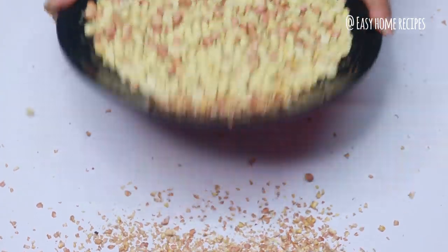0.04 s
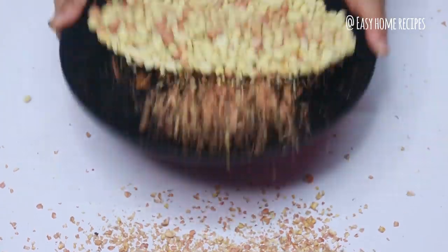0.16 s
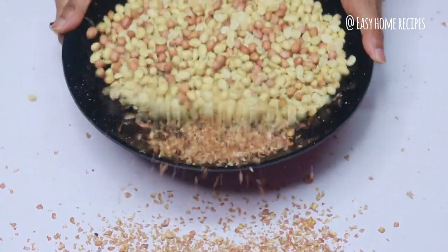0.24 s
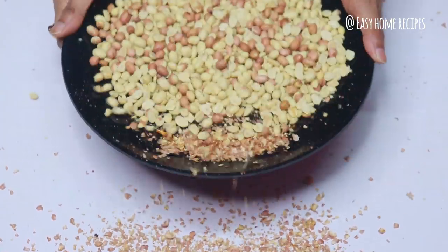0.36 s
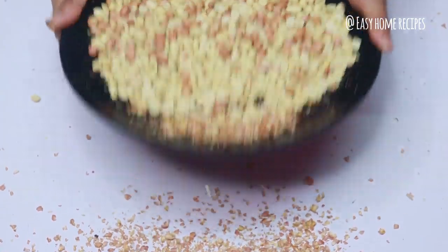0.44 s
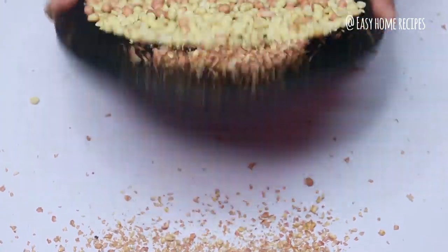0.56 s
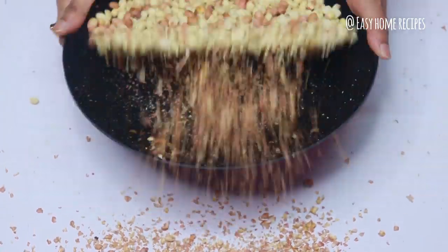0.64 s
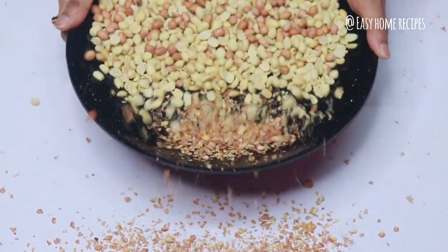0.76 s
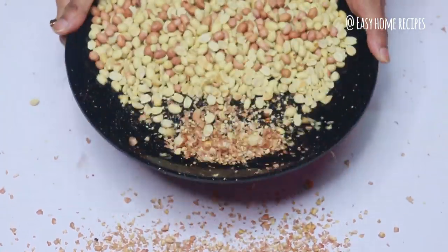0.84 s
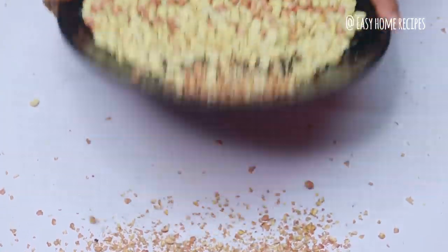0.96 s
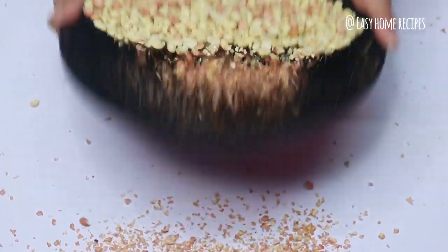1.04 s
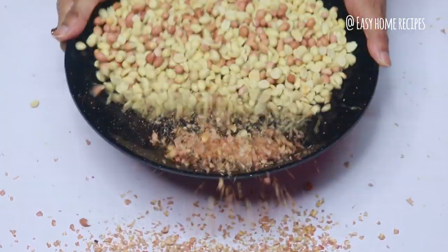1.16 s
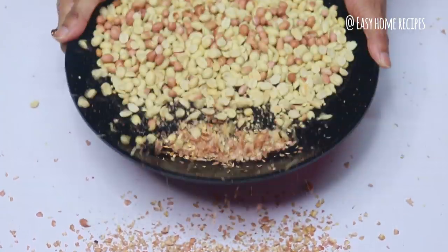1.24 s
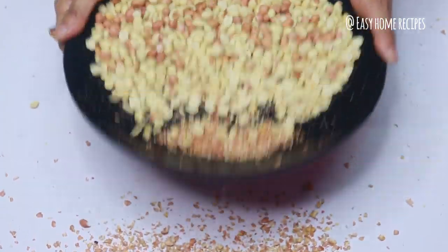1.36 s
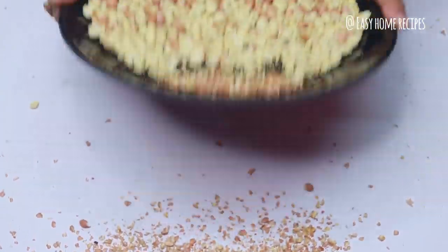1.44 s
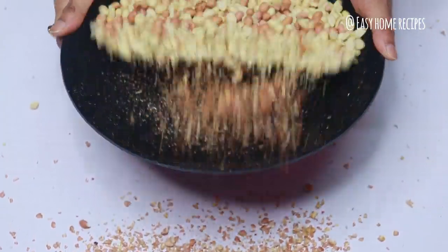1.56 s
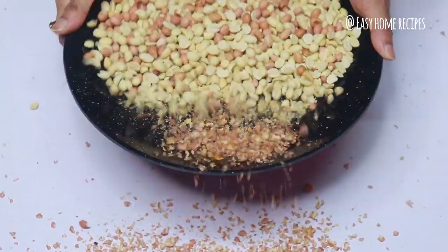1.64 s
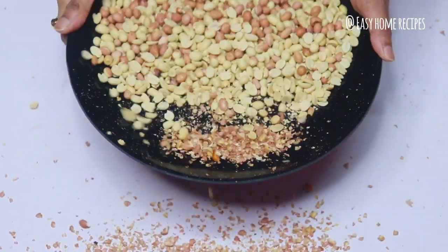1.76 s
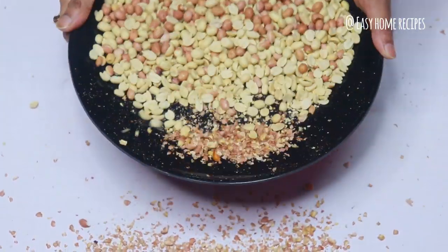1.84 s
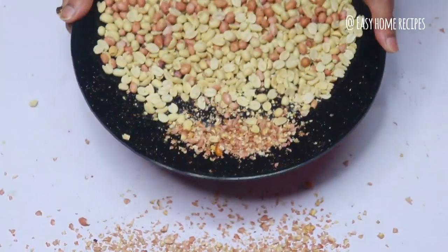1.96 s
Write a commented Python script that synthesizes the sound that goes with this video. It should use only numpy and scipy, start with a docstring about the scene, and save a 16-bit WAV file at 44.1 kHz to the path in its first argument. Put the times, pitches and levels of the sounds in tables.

```python
"""A heap of roasted peanuts is tossed on a wide plate about twice a second in a small kitchen.
An earlier toss is still dying away at first, over a steady room tone, with stray ticks in most of the pauses.
Every landing is a shower of random impacts: each rings decaying plate modes and a short noise burst.
Rolling follows each landing and dies away; low booms, gliding sines, swell now and then.
The recorder clips any peak above full scale."""
import sys
import numpy as np
from scipy import signal
from scipy.fft import rfft, irfft
from scipy.io import wavfile

SR = 44100
rng = np.random.default_rng(int(sys.argv[2]) if len(sys.argv) > 2 else 0)


def int16_out(signal):
    """Quantize to a 16-bit WAV file."""
    q = np.round(np.clip(np.atleast_2d(signal).T, -1, 1) * 32767)
    wavfile.write(sys.argv[1], SR, q.astype(np.int16))


def gain_from_db(level_db):
    """Turn a decibel level (scalar or array-like) into a linear amplitude factor."""
    decades = np.asarray(level_db, float) / 20
    return 10 ** decades


N = 88200
LEAD = SR // 2  # samples computed ahead of time zero, so that the earlier toss is heard dying away

# Tosses of the heap. Each row: first contact, first clicks, middle of the landing and its spread, all in
# seconds, rolling level in dB relative to the landing, factor on the rolling decay time,
# then landing levels in dB of heap, plate knocks, clicks and skins.
TOSS_ROWS = [(-.27, -.26, -0.22, 0.011, -9, 1.65, -19.5, -9.5, -14, -11.5),
             (0.183, 0.197, 0.25, 0.036, -8, 1.005, -14.5, -9.5, -10.5, -11),
             (0.611, 0.632, 0.71, 0.041, -7, 0.87, -15, -11, -12, -13),
             (1.079, 1.082, 1.167, 0.038, -6.5, 1.08, -15, -11.5, -13.5, -13),
             (1.533, 1.554, 1.634, 0.038, -4.5, 0.78, -16.5, -12.5, -12, -13.5)]


def colour(x, points):
    """Minimum-phase filtering: the folded cepstrum of a log gain through (Hz, dB) points is causal."""
    p = np.array(points, float)
    f = np.maximum(np.arange(1025) * SR / 2048, 1)
    log_gain = np.interp(np.log(f), np.log(p[:, 0]), p[:, 1]) * np.log(10) / 20
    cepstrum = irfft(log_gain)
    cepstrum[1:1024] *= 2
    cepstrum[1025:] = 0
    response = irfft(np.exp(rfft(cepstrum)))
    return signal.fftconvolve(x, response)[:len(x)]


def unit(x):
    """Normalization: the sum of squares becomes 1."""
    return x / np.sqrt(np.sum(x ** 2))


def fade(t, t60):
    """Exponential decay: linear damping lowers the amplitude by 60 dB in t60 seconds."""
    return np.exp(-np.log(1000) * t / t60)


def room_tone():
    """Stationary noise: a random signal with a fixed spectral envelope, strongest in the bass."""
    # Each row: frequency in Hz, relative level in dB.
    envelope = [(20, -19), (45, -2), (70, 2.5), (110, -5.5), (250, -8), (500, -11), (1500, -15),
                (4000, -20.5), (9000, -30), (15500, -33)]
    rms_db = -48
    noise = colour(rng.standard_normal(N + SR), envelope)[SR:]
    return unit(noise) * np.sqrt(N) * gain_from_db(rms_db)


def body(modes, modes_db, points, t60):
    """Modal superposition: a spot's place sets its share of each mode; a noise burst joins them."""
    place_db, detune = 9, 0.0045  # standard deviations: mode level, relative frequency
    t = np.arange(SR // 10) / SR
    luck = rng.standard_normal((len(modes), 2))
    ring = 0
    for (hz, db, mode_t60), (share, shift) in zip(modes, luck):
        sine = np.sin(2 * np.pi * hz * (1 + detune * shift) * t)
        # the square root keeps a mode's energy from growing with its decay time
        ring = ring + gain_from_db(db + place_db * share) * sine * fade(t, mode_t60) / np.sqrt(mode_t60)
    burst = colour(rng.standard_normal(len(t)) * fade(t, t60), points)
    return unit(gain_from_db(modes_db) * unit(ring) + unit(burst))


def shower(index, lag, wide, roll_db, roll_t60):
    """Power envelope: landings spread about their middle feed rolling that decays exponentially."""
    squareness = 2.324  # exponent of the landing's bell curve; 2 is Gaussian
    swell_s, roll_build_s = 0.033, 0.027
    t = np.arange(-LEAD, N) / SR
    power = 1e-9
    for contact, clicks, middle, spread, below_db, longer, *levels_db in TOSS_ROWS:
        onset = (contact, clicks)[index // 2]  # heap and plate knocks start at contact
        bell = np.exp(-np.abs((t - middle - lag) / (spread * wide)) ** squareness)
        land = bell * np.clip((t - onset) / swell_s, 0, 1)
        # power decays as the square of amplitude, hence the 2
        keep = fade(2 / SR, roll_t60 * longer)
        roll = signal.lfilter([1 / (SR * spread * np.sqrt(2 * np.pi))], [1, -keep], land)
        build = 1 / (SR * roll_build_s)
        roll = signal.lfilter([build], [1, build - 1], roll)
        power = power + gain_from_db(2 * levels_db[index]) * (land + gain_from_db(2 * (below_db + roll_db)) * roll)
    return power


def impacts(power, scatter_db, first_db, spots, luck):
    """Shot noise: random impacts, fewer and lighter as power falls, are convolved with spot responses."""
    # First nuts to land. Each row: time in seconds, level in dB before the layer's own offset.
    first_nuts = [(0.205, -38), (0.2106, -20), (.219, -20), (0.6308, -15), (0.6395, -42), (0.651, -26),
                  (0.6573, -18), (0.6758, -4), (1.0914, -46), (1.1036, -42), (1.1124, -16), (1.5642, -20),
                  (1.5775, -13.5), (1.5908, -5)]
    most_per_s, sparse = 7000, 0.14  # sparse: exponent by which the impact rate follows power
    odds = np.clip((power / power.max()) ** sparse, 1e-3, 1) * most_per_s / SR
    size = gain_from_db(-scatter_db * np.log(luck[:, 1] + 0.004))  # the small term bounds the biggest impact
    hits = (luck[:, 0] < odds) * size * np.sqrt(power / odds / np.mean(size ** 2))
    for s, db in first_nuts:
        hits[int(s * SR) + LEAD] = gain_from_db(db + first_db) / np.abs(spots[0][0]).max()
    # each toss finds its own spots on the plate
    edges = [0] + [int(row[0] * SR) + LEAD for row in TOSS_ROWS[1:]] + [len(power)]
    out = np.zeros(len(power) + SR)
    for a, b, bodies in zip(edges, edges[1:], spots):
        spot = (luck[a:b, 2] * len(bodies)).astype(int)
        ring = sum(signal.fftconvolve(hits[a:b] * (spot == k), one) for k, one in enumerate(bodies))
        out[a:a + len(ring)] += ring
    return out[:len(power)]


def nuts():
    """Contact excitation: four kinds of impact, from the heap's weight to rustling skins, ring modes."""
    # Plate modes. Each row: nominal frequency in Hz, relative level in dB, decay time t60 in seconds.
    plate = [(441.3, -19, 0.24), (520, -4, 0.42), (629, -13, 0.24), (660, -12.5, 0.24), (724.7, 9, 0.22),
             (784.7, 11, 0.12), (928.7, -16, 0.077), (1175, -18, .05), (1357, 0.5, 0.11), (1450, -12, 0.13),
             (1640, -8, 0.078), (1748, 4, 0.093), (2318, -8.5, 0.21), (2720, 11, 0.025), (2868, -7, 0.091),
             (3570, 0.5, 0.15), (4010, -24.5, 0.12), (4900, -8, 0.017), (6140, 1, 0.06), (7165, 1, 0.019),
             (8330, 1.5, 0.019), (9320, -14, 0.0067)]
    # Spectra of the four noise bursts. Each row: frequency in Hz, relative level in dB.
    heap = [(220, -51.5), (350, -14), (480, 2), (750, 4), (1100, -13.5), (2500, -40.5)]
    knock = [(400, -36.5), (800, -10.5), (1200, 2.5), (1750, 5.5), (2100, -20), (4500, -37.5)]
    click = [(900, -24), (1900, -1), (2800, 2.5), (3600, -0.5), (4600, -4.5), (9000, -35)]
    skins = [(2500, -44.5), (4500, -0.5), (6200, 1.5), (8500, 0), (10000, -6.5), (12500, -19), (15600, -41)]
    # The next three tables have a row each for heap, plate knocks, clicks and skins.
    # Each row: lag in seconds, factor on the spread, offset of the rolling in dB, rolling t60 in seconds
    # before the toss's factor, scatter of impact sizes in dB, offset of the first nuts in dB.
    layers = [(-.002, 0.79, 2, 0.35, 2.5, -12.5), (0.006, 1.0, 2, 0.28, 2, -27),
              (.02, 1.22, 2.5, 0.41, 1.5, -10), (.022, 1.04, 0.5, 0.3, 3.5, -11)]
    # Each row: lower and upper limit in Hz of the modes rung.
    rung = [(0, 900), (900, 2000), (2000, 4500), (4500, 20000)]
    # Each row: level of the modes relative to the burst in dB, burst t60 in seconds.
    contact = [(-1.5, 0.078), (-3.5, 0.033), (-5, 0.04), (-5.5, 0.029)]
    out = 0
    luck = rng.random((N + LEAD, 3))  # shared draws: one nut sounds in every layer at once
    for k, burst in enumerate([heap, knock, click, skins]):
        lag, wide, roll_db, roll_t60, scatter_db, first_db = layers[k]
        lowest, highest = rung[k]
        modes_db, burst_t60 = contact[k]
        modes = [m for m in plate if lowest < m[0] < highest]
        spots = [[body(modes, modes_db, burst, burst_t60) for _ in range(8)] for _ in TOSS_ROWS]
        power = shower(k, lag, wide, roll_db, roll_t60)
        out = out + impacts(power, scatter_db, first_db, spots, luck)
    return out


def strays():
    """Damped noise bursts: single light ticks of skins and halves, each bright around its own centre."""
    # Stray ticks. Each row: start in seconds, peak level in dB, centre frequency in Hz.
    ticks = [(0.011, -37, 4670), (.026, -22.5, 7700), (0.032, -32, 13000), (0.037, -47.5, 13000),
             (0.098, -34.5, 7900), (0.148, -34, 6000), (0.196, -41, 5030), (0.887, -37, 14160),
             (1.326, -29.5, 10500), (1.392, -38, 13740), (1.424, -23, 7860), (1.433, -48, 14570),
             (1.471, -36, 13600), (1.522, -39.5, 14000), (1.747, -32, 12800), (1.85, -48, 8810)]
    t60 = 0.0072  # seconds
    out = np.zeros(N + SR)
    t = np.arange(SR // 40) / SR
    for s, db, hz in ticks:
        peak = [(hz / 6, -22), (hz / 1.7, -8), (hz, 0), (hz * 1.46, -10)]
        tick = colour(rng.standard_normal(len(t)) * fade(t, t60), peak)
        i = int(s * SR) + LEAD
        out[i:i + len(t)] += gain_from_db(db) * tick / np.abs(tick).max()
    return out[:N + LEAD]


def room(x):
    """Diffuse reverberation: convolution with noise whose bands decay at their own rates."""
    # Each row: band frequency in Hz, decay time t60 in seconds.
    bands = [(300, 0.24), (1000, 0.46), (3000, 0.21), (7000, 0.24), (13000, 0.12)]
    t = np.arange(SR // 2) / SR
    tail = 0
    for k, (_, t60) in enumerate(bands):
        only = [(f, 0 if j == k else -40) for j, (f, _) in enumerate(bands)]
        tail = tail + colour(rng.standard_normal(len(t)), only) * fade(t, t60)
    tail = tail * np.clip(t / 0.0041, 0, 1)  # builds up over 4.1 ms
    return signal.fftconvolve(x, unit(tail))[:len(x)]


def booms():
    """Frequency glide: the integral of a sagging frequency is the phase of a tone that swells and fades."""
    # Each row: start, rise and decay time t60 in seconds, level in dB, start and end frequency in Hz,
    # overtone frequency in Hz, overtone level in dB relative to the low tone.
    swells = [(0.357, 0.016, 0.86, -37.5, 65.3, 44, 269, -17),
              (1.722, 0.12, 0.18, -34.5, 58.9, 58, 283, -12.5),
              (1.866, 0.063, 0.57, -31.5, 55, 54, 178.7, -19)]
    glide_s = 0.028  # time constant
    out = 0
    for s, rise, t60, db, hz0, hz1, over_hz, over_db in swells:
        t = np.maximum(np.arange(N) / SR - s, 0)
        swell = np.sin(np.pi / 2 * np.minimum(t / rise, 1)) ** 2
        shape = swell * fade(np.maximum(t - rise, 0), t60)
        phase = 2 * np.pi * np.cumsum(hz1 + (hz0 - hz1) * np.exp(-t / glide_s)) / SR
        overtone = gain_from_db(over_db) * np.sin(2 * np.pi * over_hz * t) * shape  # fades twice as fast
        out = out + gain_from_db(db) * np.sqrt(2) * shape * (np.sin(phase) + overtone)
    return out


def scene():
    """Superposition: nuts, plate and ticks with their reverberation add to booms and room tone."""
    bass_edge_hz, room_db = 381, -11
    # keeps the nuts and ticks free of bass
    bass_cut = signal.butter(4, bass_edge_hz, "high", fs=SR, output="sos")
    near = signal.sosfilt(bass_cut, nuts() + strays())
    wet = (near + gain_from_db(room_db) * room(near))[LEAD:]
    return (wet + booms() + room_tone())[None]


def low_pass(x):
    """Removes everything above the highest recorded frequency."""
    return signal.sosfilt(signal.butter(12, 15610, fs=SR, output="sos"), x)


def record(dry):
    """Saturation: the input clips peaks above full scale; a high-pass then removes the deep bass."""
    ceiling, low_cut_hz = 1.0, 12
    clipped = np.clip(dry, -ceiling, ceiling)
    cut = signal.butter(2, low_cut_hz, "high", fs=SR, output="sos")
    mix = signal.sosfilt(cut, clipped)
    return low_pass(mix)


dry = scene()
out = record(dry)
int16_out(out)
```